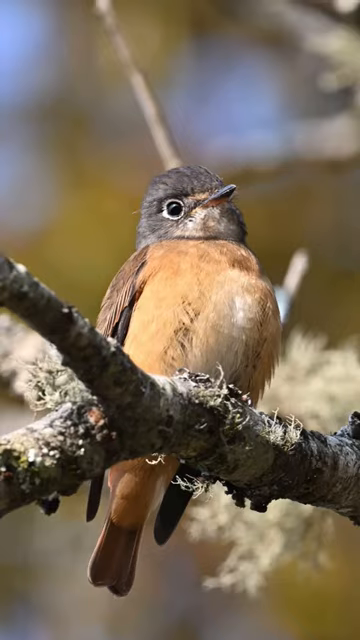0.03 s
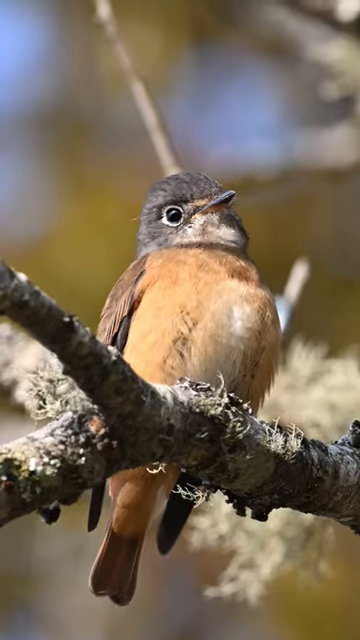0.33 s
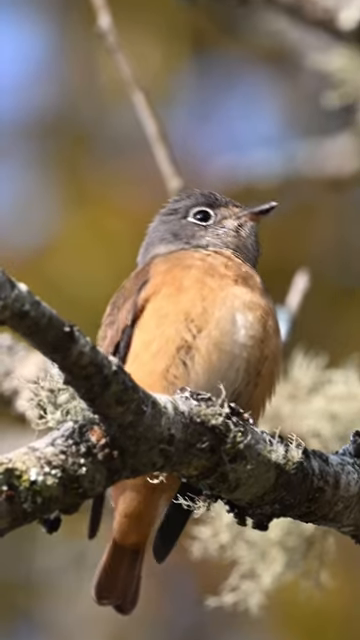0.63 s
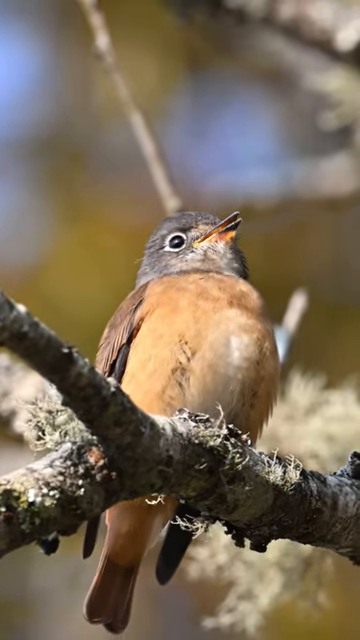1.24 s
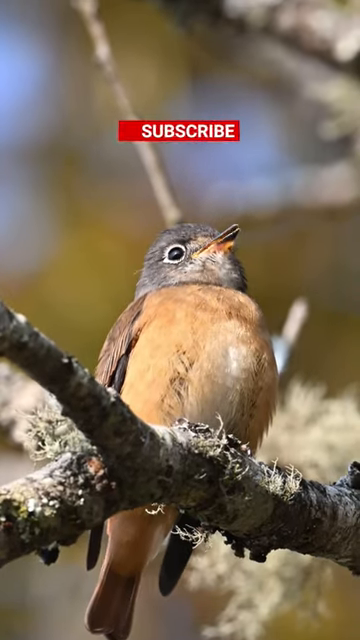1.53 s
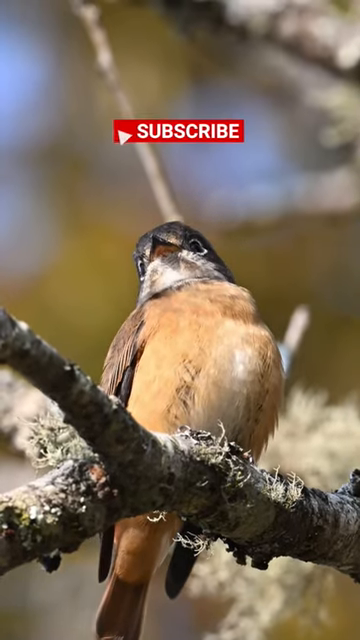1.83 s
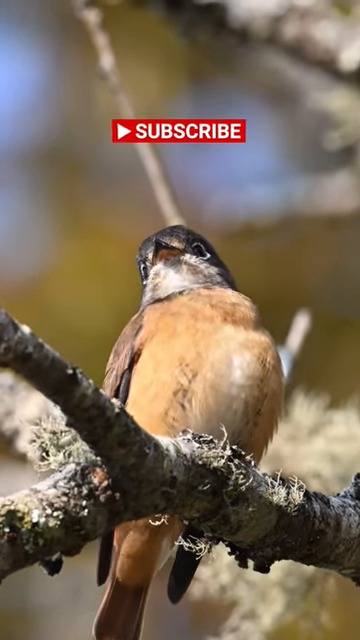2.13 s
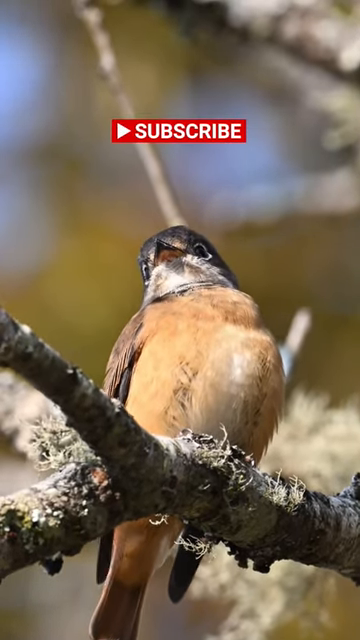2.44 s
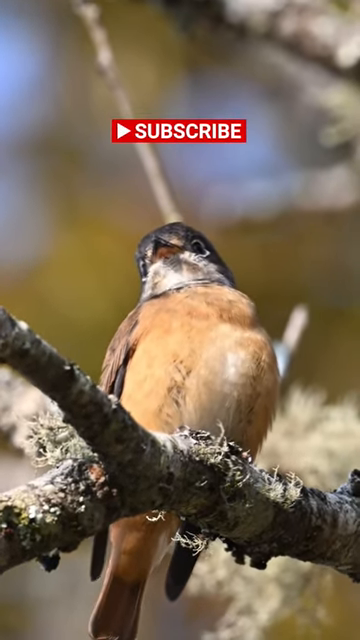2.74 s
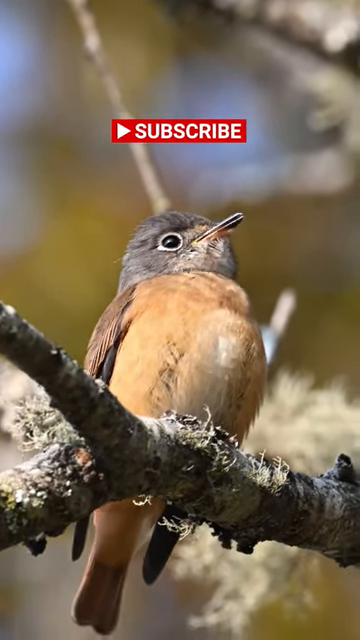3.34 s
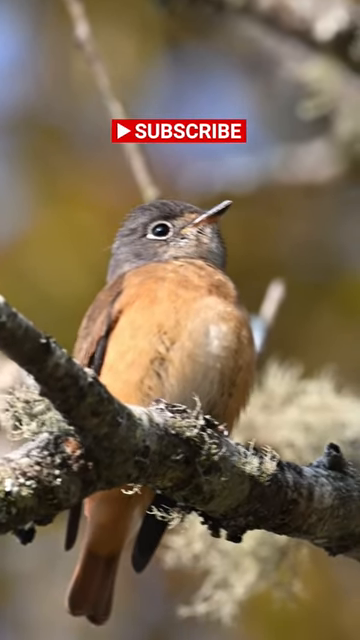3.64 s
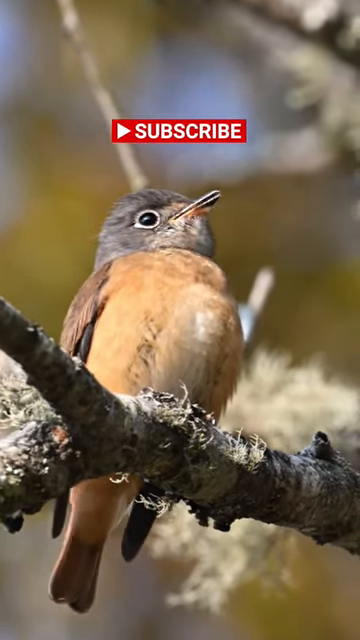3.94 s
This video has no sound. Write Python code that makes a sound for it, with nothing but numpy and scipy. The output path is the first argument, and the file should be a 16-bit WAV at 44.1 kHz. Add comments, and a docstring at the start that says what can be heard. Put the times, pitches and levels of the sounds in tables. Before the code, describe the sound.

High slurs, a quick trill and chirps from a small bird nearby, over outdoor hiss.

```python
"""Flycatcher on a branch

A flycatcher sings two thin falling slurs, a trill of nine down-sweeps, then a rising note and a
few upward flicks. For the rising note, both sides of its voice box (the syrinx) sound at once.
Branches scatter the sound. Other birds twitter and whistle farther off, over a low distant
drone and a steady outdoor hiss."""
import sys
import numpy as np
from scipy import signal
from scipy.fft import rfft, irfft
from scipy.io import wavfile
from scipy.ndimage import map_coordinates

SR = 44100
rng = np.random.default_rng(int(sys.argv[2]) if len(sys.argv) > 2 else 0)


def persist_wave(psi):
    """Save psi, clipped to +-1, as 16-bit WAV."""
    counts = np.round(np.clip(psi, -1, 1) * 32767).astype(np.int16)
    wavfile.write(sys.argv[1], SR, np.atleast_2d(counts).T)


N = 176400
TIME = np.arange(N) / SR


def from_db(db):
    """Turn decibels into a number to multiply a sound by."""
    return 10 ** (np.asarray(db) / 20)


def rms_one(x):
    """Scale a sound so its average strength (rms) is 1."""
    return x / np.sqrt(np.mean(x ** 2) + 1e-20)


def wander(t, rate):
    """A smooth random wobble of about 1 either way, renewed rate times a second."""
    steps = (t - t[0]) * rate
    return map_coordinates(rng.standard_normal(4096), [steps], order=3, mode="wrap")


def add(out, start, sound):
    """Mix a sound in at its start time."""
    i = int(start * SR)
    out[..., i:i + sound.shape[-1]] += sound[..., :N - i]


def scatter(x, fade_s):
    """Countless echoes off leaves and trunks, different at each ear, dying by 60 dB in fade_s."""
    t = TIME[:SR]
    build_up = 1 - np.exp(-t / .004)
    tail = rng.standard_normal((2, SR)) * from_db(-60 * t / fade_s) * build_up
    tail /= np.sqrt(np.sum(tail ** 2, axis=1, keepdims=True))
    return signal.fftconvolve(x[None], tail, axes=1)[:, :N]


# The hiss from low to high, as relative strength per Hz: f/Hz, left level/dB, right level/dB
AIR_COLOUR = [(20, -83, -83), (32, -71, -71.5), (59, -61, -61), (81, -69, -69), (135, -73.5, -73.5),
              (170, -73.5, -73.5), (251, -78, -78.5), (520, -81.5, -82), (837, -81, -85), (1027, -75, -80),
              (1300, -73, -78), (1540, -75, -80.5), (1894, -91.5, -86), (2416, -100.5, -98),
              (3110, -89.5, -99.5), (3640, -90, -92.5), (4750, -97.5, -96), (6800, -100, -104),
              (8400, -101, -107), (9800, -104, -108), (10355, -95, -109), (11960, -109, -107),
              (13330, -115, -114), (14700, -120, -120)]
# How alike the hiss is at the two ears: f/Hz, likeness (1 = the same)
AIR_LIKENESS = [(130, 1.0), (290, 1.0), (640, 0.93), (1410, 0.674), (3100, 0.013)]
def air():
    """Steady outdoor noise: the rumble is alike at both ears, the hiss comes from all around."""
    log_hz = np.log(np.maximum(np.arange(N // 2 + 1) * SR / N, 1))
    colour, likeness = np.array(AIR_COLOUR), np.array(AIR_LIKENESS)
    alike = np.sqrt(np.interp(log_hz, np.log(likeness[:, 0]), likeness[:, 1]))
    shared, opposite = rfft(rng.standard_normal((2, N)))
    ears = np.sqrt((1 + alike) / 2) * shared + np.sqrt((1 - alike) / 2) * opposite * [[1], [-1]]
    gain = from_db([np.interp(log_hz, np.log(colour[:, 0]), db) for db in colour.T[1:]])
    sway_db = -.5 + .5 * wander(TIME, 6.34)
    return irfft(ears * gain, N) * np.sqrt(SR / 2) * from_db(sway_db)


# How the drone's main tone swells and sinks: t/s, relative level/dB
HUM_SWELL = [(0.11, -50), (0.16, -47), (1.7, -49.5), (1.73, -76), (1.81, -45.5), (1.88, -53.5), (2.17, -61),
             (2.2, -45.5), (3.02, -51), (3.19, -72), (3.24, -45), (3.41, -47), (3.55, -53), (3.7, -44.5),
             (3.94, -60.5), (4.0, -48)]
# The drone's weaker tones: f/Hz, width/Hz, level/dB
DRONE_TONES = [(60.96, 10, -51.5), (198.4, 7, -65), (273.2, 12, -61.5), (409.7, 8, -66)]
def drone():
    """A low, far hum made of one main tone and four weaker ones, all wavering."""
    hum_hz = 106.6 + 2.69 * wander(TIME, 12)
    hum_db = np.interp(TIME, *np.transpose(HUM_SWELL)) - .5 + 3 * wander(TIME, 12)
    out = np.sqrt(2) * from_db(hum_db) * np.sin(2 * np.pi * np.cumsum(hum_hz) / SR)
    for hz, width, db in DRONE_TONES:
        sway = wander(TIME, 2 * width) + 1j * wander(TIME, 2 * width)  # blurs pitch and level
        out += from_db(db) * rms_one(np.real(sway * np.exp(2j * np.pi * hz * TIME)))
    return out


# The overtone an octave above a bird's tone: its own f/Hz, level/dB compared with the tone
OCTAVE_LEVELS = [(8000, -43), (10000, -15), (12000, -29), (13500, -46)]
# How strongly each pitch of the near bird reaches each ear: f/Hz, left level/dB, right level/dB
EAR_LEVELS = [(4230, -4, 0.5), (5740, 1.5, -6), (6340, 7.5, -12), (6800, 1, -20), (6900, 2.5, -2.5),
              (8900, 2, -6)]
def syrinx(t, hz, db, far=False):
    """A bird's voice box: a shaky tone and a faint rough octave. Rows: plain voice, left, right."""
    pitch_share, flutter_db, wobbles_per_s = (.0176, 2, 160) if far else (.0068, 1.5, 423)
    shaky_hz = hz * (1 + pitch_share * wander(t, wobbles_per_s))
    phase = 2 * np.pi * np.cumsum(shaky_hz) / SR
    edges = np.clip(np.minimum(t - t[0], t[-1] - t) / .00027, 0, 1)  # tiny fades avoid clicks
    roughness = .89 * wander(t, 1600)
    octave = from_db(np.interp(2 * hz, *np.transpose(OCTAVE_LEVELS))) * np.sin(2 * phase + roughness)
    loudness = edges * from_db(db + flutter_db * wander(t, wobbles_per_s))
    voice = np.sqrt(2) * loudness * (np.sin(phase) + octave)
    ear_hz, left_db, right_db = np.transpose(EAR_LEVELS)
    return voice * from_db([0 * hz, np.interp(hz, ear_hz, left_db), np.interp(hz, ear_hz, right_db)])


# A quick note swells and fades steeply: share of the note gone by, relative level/dB
QUICK_SWELL = [(0, -19), (.12, -6), (.55, -4), (.75, -7), (1, -18.5)]
# A far whistle does so gently: share of the note gone by, relative level/dB
GENTLE_SWELL = [(0, -5), (.2, -1.5), (.5, -1), (1, -3.5)]
def note(length, first_hz, middle_hz, last_hz, db, far=False):
    """A short note that bends through three pitches while it swells and fades."""
    t = np.arange(int(length * SR)) / SR
    progress = t / length
    hz = np.polyval(np.polyfit([0, .5, 1], [first_hz, middle_hz, last_hz], 2), progress)
    swell_db = np.interp(progress, *np.transpose(GENTLE_SWELL if far else QUICK_SWELL))
    return syrinx(t, hz, db + swell_db, far)


def chip(top_hz, db):
    """One tiny chirp whose pitch goes up and comes back down."""
    foot_hz = top_hz - 1330
    return note(.0093, foot_hz, top_hz, foot_hz, db)[0]


def twitter():
    """A far bird's soft, fading run of slightly uneven chips."""
    first_s, end_s, gap_s, fade_db_per_s = .11, .31, .018, 24
    out = np.zeros(N)
    for start in np.arange(first_s, end_s, gap_s):
        late, sharp = rng.uniform(-.91, 1, 2)
        db = -54 - fade_db_per_s * (start - first_s)
        add(out, start + late * gap_s / 4, chip(5000 + 290 * sharp, db))
    return out


def noise_band(low_hz, high_hz):
    """Hiss between two pitches, different at each ear."""
    band = signal.butter(2, [low_hz, high_hz], "band", fs=SR, output="sos")
    return rms_one(signal.sosfilt(band, rng.standard_normal((2, N))))


# Soft rasps around the two slurs: middle t/s, half-length/s, level/dB
RASP_SWELLS = [(0.808, 0.015, -53), (0.892, 0.055, -59), (0.943, .014, -67), (0.977, 0.019, -50.5)]
def rasps():
    """Brief swells of dry noise."""
    swell = sum(from_db(db) * np.exp(-((TIME - middle) / half) ** 2) for middle, half, db in RASP_SWELLS)
    return swell * noise_band(2900, 5200)


# Noise above and below the bird's tone: low f/Hz, high f/Hz, level/dB compared with the tone
SIZZLE_BANDS = [(10100, 12000, -25), (2950, 4200, -21)]
def sizzle(voice, lag_s=.012):
    """A rasp that swells with each hard-driven note and dies just after it."""
    linger = np.exp(-1 / (lag_s * SR))
    effort = signal.lfilter([1 - linger], [1, -linger], np.abs(voice) + 1e-18)
    return effort * sum(from_db(db) * noise_band(low, high) for low, high, db in SIZZLE_BANDS)


def sung(curve):
    """One note that follows a list of points of time, pitch and level."""
    out = np.zeros((3, N))
    times, hz, db = np.transpose(curve)
    t = np.arange(times[0], times[-1], 1 / SR)
    add(out, times[0], syrinx(t, np.interp(t, times, hz), np.interp(t, times, db)))
    return out


# Flicks and ticks: start t/s, length/s, first f/Hz, middle f/Hz, last f/Hz, relative level/dB
FLICK_NOTES = [(0.801, 0.0098, 3630, 4850, 7760, -40), (.933, 0.0085, 5060, 4870, 4900, -45),
               (0.97, .009, 3500, 4880, 7500, -49), (2.746, 0.0022, 4500, 5730, 7000, -46),
               (2.761, .002, 4500, 5500, 7000, -42.5), (2.764, 0.003, 4900, 6230, 8450, -45),
               (3.438, 0.019, 5600, 6920, 6870, -46.5), (3.466, 0.024, 4757, 7400, 6970, -35),
               (3.464, 0.031, 8500, 7500, 7430, -47), (3.498, 0.012, 4800, 6280, 6600, -37.5),
               (3.520, 0.0094, 5000, 5890, 6800, -39.5), (3.989, .020, 6800, 7400, 7600, -54)]
# The trill's first three notes stumble down in steps, a list each: t/s, f/Hz, relative level/dB
TRILL_STUMBLES = [
    [(1.124, 9200, -63), (1.132, 7430, -48), (1.135, 7560, -42.5), (1.141, 6370, -37), (1.147, 6200, -34.5),
     (1.150, 5530, -46), (1.153, 6540, -39), (1.158, 4680, -46), (1.163, 6020, -41), (1.169, 4000, -51)],
    [(1.198, 9200, -64), (1.205, 7760, -44), (1.211, 6680, -35.5), (1.217, 7530, -34), (1.223, 5900, -35),
     (1.226, 6600, -43), (1.232, 4960, -44)],
    [(1.256, 8200, -58), (1.263, 7400, -35), (1.272, 6320, -37.5), (1.276, 7250, -36), (1.280, 6150, -34),
     (1.286, 4800, -48), (1.289, 6100, -47), (1.295, 4200, -48)],
]
# Its other six sweep plainly down; the columns are those of the flicks
TRILL_SWEEPS = [(1.32, 0.032, 7500, 6560, 4560, -29), (1.373, 0.034, 7880, 6370, 5350, -30.5),
                (1.422, 0.031, 7930, 6960, 5160, -31), (1.471, .026, 7960, 6670, 5100, -30),
                (1.519, 0.021, 7850, 6370, 5300, -33.5), (1.566, 0.019, 7830, 6630, 5500, -36.5)]
def quick_notes():
    """The flycatcher's fastest pitch bends: its flicks, ticks and trill."""
    out = sum(sung(curve) for curve in TRILL_STUMBLES)
    for start, *shape in TRILL_SWEEPS + FLICK_NOTES:
        add(out, start, note(*shape))
    return out


# The two opening slurs, a list each: t/s, f/Hz, relative level/dB
SLUR_CURVES = [
    [(.817, 10000, -58), (.829, 8100, -61), (.833, 7360, -45.5), (.846, 6140, -40), (.862, 5670, -39),
     (.882, 5170, -52), (.897, 5050, -52)],
    [(.986, 7700, -64), (.992, 6800, -50), (.997, 6200, -40.5), (1.006, 6060, -46), (1.018, 5840, -37),
     (1.034, 5580, -35.5), (1.041, 5100, -46), (1.048, 4850, -48)],
]
def slurs():
    """The flycatcher slides a thin, high tone downwards, twice."""
    return sum(sung(curve) for curve in SLUR_CURVES)


# What the low and the high side of the voice box sing: t/s, f/Hz, relative level/dB
LOW_SIDE = [(3.285, 3410, -59), (3.318, 3450, -58.5), (3.334, 3850, -43), (3.356, 4100, -45.5),
            (3.370, 4214, -34.5), (3.385, 4030, -47), (3.392, 4070, -51)]
HIGH_SIDE = [(3.292, 4960, -55), (3.320, 5230, -51), (3.345, 6150, -44), (3.358, 7450, -51.5),
             (3.368, 7200, -61), (3.376, 6300, -61.5)]
def rising_note():
    """Two voices at once shake each other, adding a third tone at the sum of their pitches."""
    low, high = sung(LOW_SIDE), sung(HIGH_SIDE)
    sum_tone = np.real(signal.hilbert(low[0]) * signal.hilbert(high[0]))
    return low + high + from_db(23) * sum_tone


# Echoes off nearby branches: delay t/s, left level/dB, right level/dB
BRANCH_ECHOES = [(.0028, -20, -6.5), (.0095, -9, -23)]
def flycatcher():
    """The near bird's whole song, with bright echoes off twigs and a faint tail from the wood."""
    quick = quick_notes()
    song = quick + slurs() + rising_note()
    voice = song[0]
    heard = song[1:] + sizzle(quick[0])
    # Thin twigs throw back only the highest pitches.
    bright = signal.sosfilt(signal.butter(2, 6800, "high", fs=SR, output="sos"), voice)
    for delay, left_db, right_db in BRANCH_ECHOES:
        add(heard, delay, from_db([[left_db], [right_db]]) * bright)
    twigs = from_db(-2.5) * scatter(bright, fade_s=.15)
    wood = from_db(-25) * scatter(voice, fade_s=.29)
    return from_db(-1) * (heard + twigs + wood)


# Far chips: start t/s, top f/Hz, relative level/dB
CHIP_NOTES = [(1.717, 5130, -49), (1.735, 5020, -50.5), (1.791, 5130, -57), (1.809, 5120, -52),
              (1.827, 5000, -50), (2.089, 5100, -52.5), (2.107, 4870, -48), (2.127, 4810, -43),
              (2.146, 4720, -43.5), (2.156, 5050, -49), (2.215, 4480, -51), (2.234, 4570, -46.5),
              (2.253, 4730, -50)]
def chips():
    """A far bird answers the trill with bursts of tiny chirps."""
    out = np.zeros(N)
    for start, top_hz, db in CHIP_NOTES:
        add(out, start, chip(top_hz, db))
    return out


# Far whistles: start t/s, length/s, first f/Hz, middle f/Hz, last f/Hz, relative level/dB
WHISTLE_NOTES = [(2.083, 0.057, 3780, 3510, 3330, -58), (2.448, 0.0325, 3460, 2775, 2810, -59.5),
                 (2.48, 0.11, 5020, 4830, 4280, -59), (2.653, 0.11, 3520, 3364, 3170, -58.5),
                 (2.789, 0.1, 4610, 4120, 3880, -55.5), (2.795, 0.047, 3440, 2593, 2460, -51),
                 (2.799, 0.051, 6500, 5300, 4770, -62), (2.86, 0.0302, 2636, 3050, 2670, -55.5),
                 (2.932, 0.024, 3160, 3110, 3050, -60), (2.92, 0.17, 5500, 5170, 4580, -66.5),
                 (3.557, 0.027, 5640, 5450, 4900, -64.5), (3.625, 0.12, 5730, 5340, 5050, -65)]
def whistles():
    """Far birds whistle soft, wavering notes, most of them falling."""
    out = np.zeros(N)
    for start, *shape in WHISTLE_NOTES:
        add(out, start, from_db(1) * note(*shape, far=True)[0])
    return out


def far_birds():
    """Twitter and whistles ahead and chips to the right, all blurred by the trees."""
    ahead, right = twitter() + whistles(), chips()
    direct = ahead + right * from_db([[-6], [6]])
    return direct + scatter(from_db(-1) * ahead + from_db(-1.5) * right, fade_s=.35)


def scene():
    """Birds near and far over the hiss and the drone."""
    return air() + drone() + far_birds() + rasps() + flycatcher()


def record(dry):
    """The sound begins after a moment of silence, and its very highest pitches are cut."""
    silence_s, cutoff_hz = .103, 15200
    opened = dry * np.clip((TIME - silence_s) / .001, 0, 1)
    return signal.sosfilt(signal.ellip(12, .1, 80, cutoff_hz, fs=SR, output="sos"), opened)


dry = scene()
out = record(dry)
persist_wave(out)
```